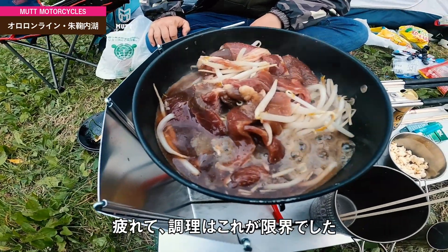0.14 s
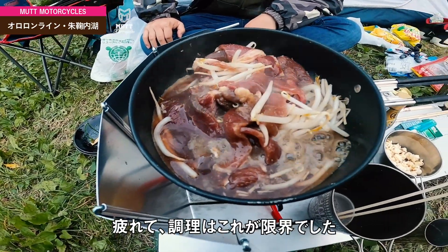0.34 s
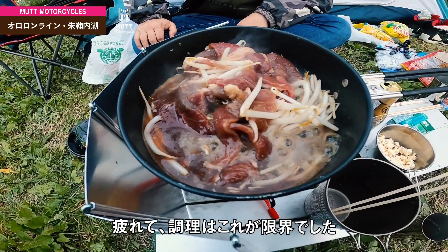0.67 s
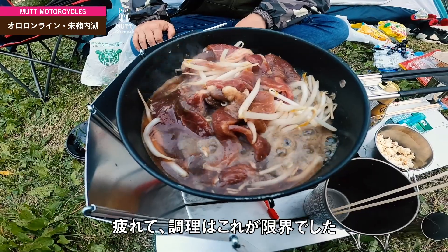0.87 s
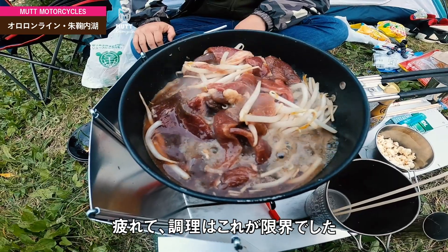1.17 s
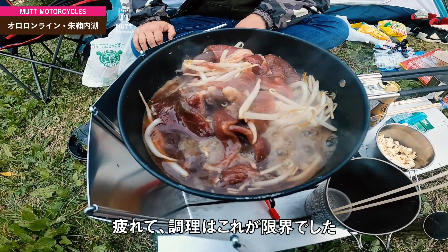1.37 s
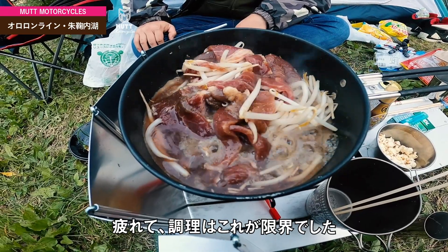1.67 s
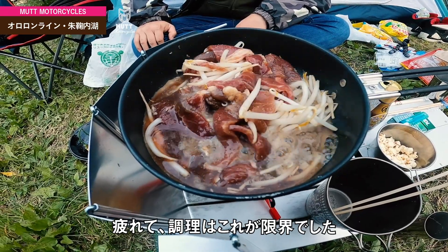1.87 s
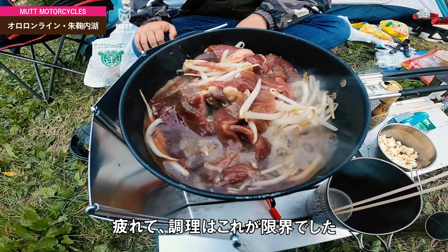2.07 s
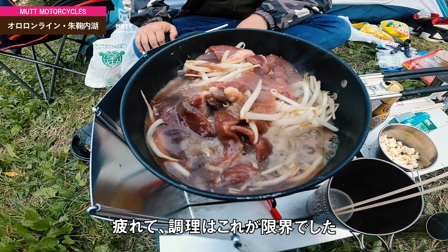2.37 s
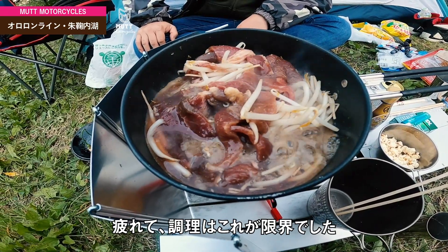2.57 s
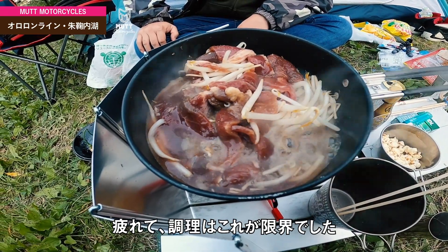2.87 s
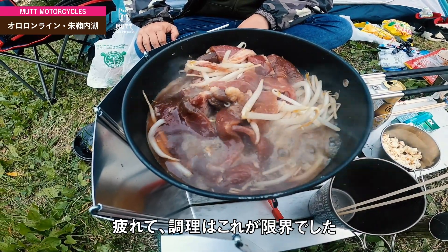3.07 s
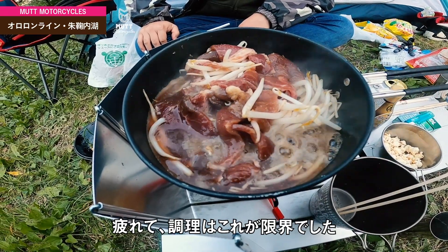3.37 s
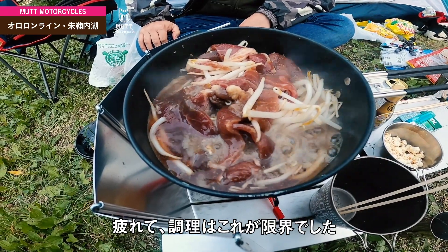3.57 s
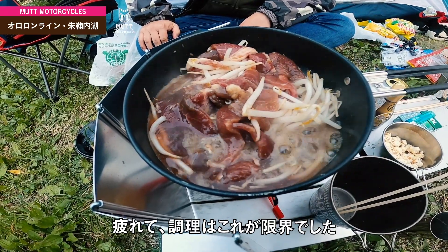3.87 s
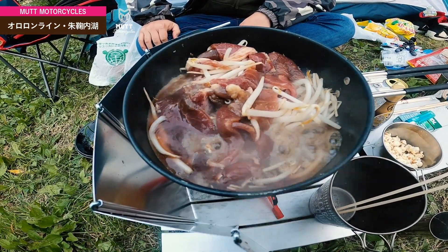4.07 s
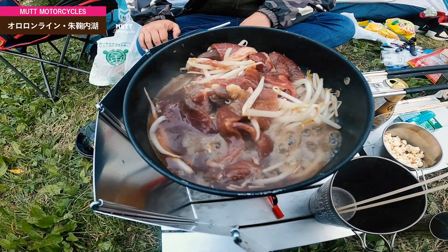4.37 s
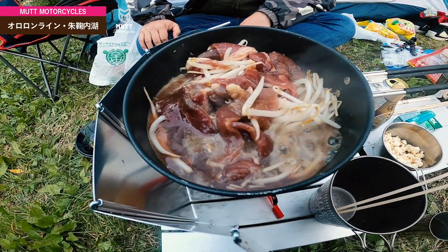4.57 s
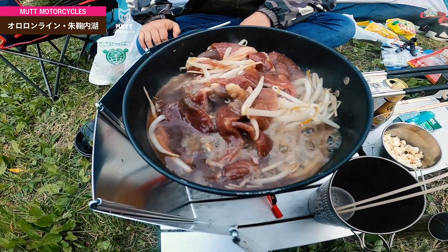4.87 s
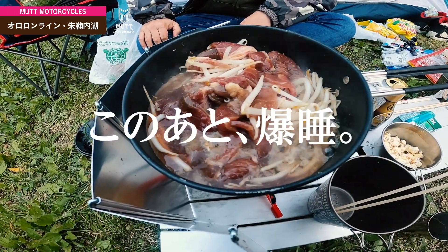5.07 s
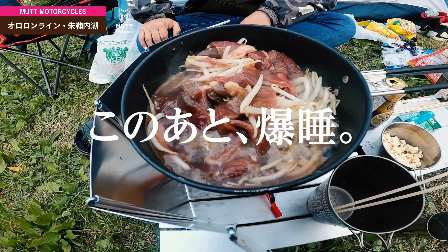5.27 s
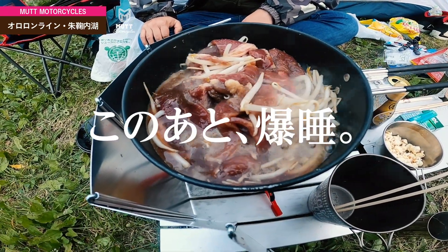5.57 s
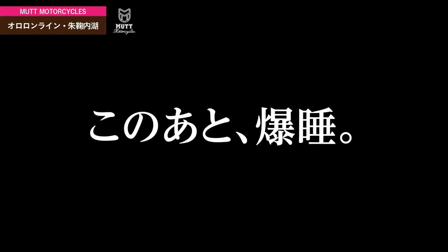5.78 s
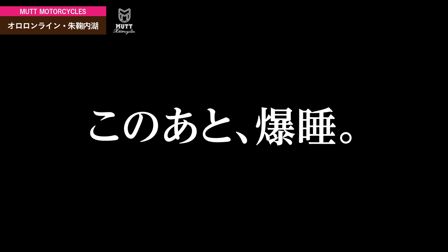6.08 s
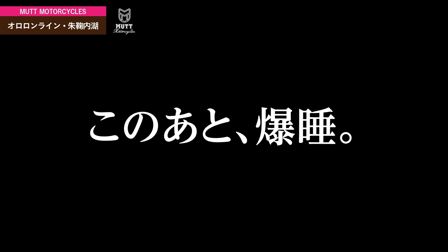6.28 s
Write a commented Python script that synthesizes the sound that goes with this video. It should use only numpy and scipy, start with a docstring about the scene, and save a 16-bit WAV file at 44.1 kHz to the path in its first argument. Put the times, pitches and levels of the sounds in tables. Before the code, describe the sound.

Outdoors, a gas burner roars steadily under a wide pan of bubbling, hissing meat in sauce, fat spitting, then everything cuts to silence.

```python
"""Simmering pan on a camping stove

Outdoors and close by, meat and bean sprouts simmer in sauce in a wide pan: filtered noise makes the burner's
roar, its drone and the hissing steam; dense random impulses through resonances make the bubbles and the fizz.
Fat spits as filtered clicks with a spray of noise. For about a second a trapped pocket of steam sputters in a
fast rattle of damped rings, which later returns faintly. The sound is cut off abruptly."""
import sys
import numpy as np
from scipy import signal
from scipy.fft import rfft, irfft, next_fast_len
from scipy.io import wavfile
from scipy.ndimage import uniform_filter1d

SR = 44100
rng = np.random.default_rng(int(sys.argv[2]) if len(sys.argv) > 2 else 0)


def wav_record(signal):
    """Record a signal, one row per channel, as 16-bit PCM in the file named by sys.argv[1]."""
    frames = np.transpose(np.atleast_2d(signal))
    bounded = np.clip(frames, -1, 1)
    # unit amplitude maps onto the largest positive 16-bit level
    quanta = np.round(bounded * 32767).astype(np.int16)
    wavfile.write(sys.argv[1], SR, quanta)


N = 284134
TIME = np.arange(N) / SR   # seconds
STOP_S = 5.779


def from_db(db):
    """Decibels to gain."""
    return 10 ** (np.asarray(db) / 20)


def rms_one(x):
    """Scale to unit power."""
    return x / np.sqrt(np.mean(x ** 2) + 1e-20)


def in_time(rows):
    """Each column of a curve table, interpolated at every sample."""
    s, *columns = np.transpose(rows)
    return [np.interp(TIME, s, column) for column in columns]


def drift(rate):
    """Slow random wandering with spread 1, made by a low-pass at this rate in Hz."""
    step = 40   # samples between computed points
    r = np.exp(-2 * np.pi * rate * step / SR)
    settle = 2000
    noise = rng.standard_normal(N // step + 2 + settle)
    slow = signal.lfilter([1], [1, -2 * r, r * r], noise)[settle:]
    return np.interp(np.arange(N) / step, np.arange(len(slow)), rms_one(slow))


def swells(rows):
    """Bell-shaped swells as a gain; the length is two standard deviations of the bell."""
    return sum(from_db(db) * np.exp(-2 * ((TIME - peak_s) / length_s) ** 2) for peak_s, length_s, db in rows)


def coloured(x, spectrum):
    """Causal (minimum-phase) filter with the given spectrum, then a gentle band-pass around it."""
    size = 2 * next_fast_len(len(x))
    hz, db = np.transpose(spectrum)
    grid = np.maximum(np.arange(size // 2 + 1) * SR / size, 1)
    cepstrum = irfft(np.log(from_db(np.interp(np.log(grid), np.log(hz), db))))
    # folding the cepstrum forward in time gives minimum phase
    cepstrum[1:size // 2] *= 2
    cepstrum[size // 2 + 1:] = 0
    response = np.exp(rfft(cepstrum))
    shaped = irfft(rfft(x, size) * response)[:len(x)]
    edges = [hz[0] / 2, min(hz[-1] * 2, SR / 2 - 1000)]
    return signal.sosfilt(signal.butter(2, edges, "band", fs=SR, output="sos"), shaped)


def resonance(x, hz, width_hz):
    """Two-pole resonance with gain 1 on top."""
    r = np.exp(-np.pi * width_hz / SR)
    feedback = [1, -2 * r * np.cos(2 * np.pi * hz / SR), r * r]
    return signal.lfilter(np.array([1, 0, -1]) * (1 - r * r) / 2, feedback, x + 1e-18)


def turbulence(spectrum):
    """Rushing gas: noise of the given colour, with rms 1."""
    return rms_one(coloured(rng.standard_normal(N), spectrum))


def steady_turbulence(spectrum):
    """Rushing gas fed at constant pressure: dividing by its own smoothed power evens its loudness; rms 1."""
    steady_s, steadiness = .08, .6   # smoothing time, share of the swings evened out
    rush = turbulence(spectrum)
    power = uniform_filter1d(rush ** 2, int(steady_s * SR))
    return rms_one(rush / (power + 1e-9) ** (steadiness / 2))


def bubbles(spectrum, per_s, spread_db, clump_db, wash_db):
    """Uneven bubbles burst in clumps, each a short damped ring, over a wash of countless faint ones; rms 1."""
    born = rng.random(N) < per_s * from_db(clump_db * drift(25)) / SR
    sizes = from_db(spread_db * np.minimum(rng.exponential(1, N), 4.5)) * rng.choice([-1, 1], N)
    pitches = np.geomspace(spectrum[1][0], spectrum[-2][0], num=8)
    dealt = rng.integers(0, len(pitches), N)
    rings = sum(resonance(born * sizes * (dealt == k), hz, hz * 0.5) for k, hz in enumerate(pitches))
    wash = from_db(wash_db) * turbulence(spectrum)
    return rms_one(rms_one(coloured(rings, spectrum)) + wash)


def click():
    """A single impulse with room to ring."""
    return signal.unit_impulse(2048)


def pop(hz, width_hz):
    """One burst: an impulse through two equal resonances gives a heavily damped ring, peak 1."""
    wave = resonance(resonance(click(), hz, width_hz), hz, width_hz)
    wave = signal.sosfilt(signal.butter(8, min(hz * 1.51, SR / 3), fs=SR, output="sos"), wave)
    return wave / np.abs(wave).max()


def add(out, s, wave):
    """Mix a short sound in at time s."""
    start = int(s * SR)
    out[start:start + len(wave)] += wave[:N - start]


def by_chance(per_s, vigour_db):
    """Random moments, closer together when vigour is high: rows (start_s, two random values of spread near 1)."""
    gaps = rng.exponential(1, 200)
    chance = np.clip(rng.standard_normal((200, 2)), -2, 2)
    due = np.cumsum(per_s * from_db(vigour_db) ** 2) / SR   # events expected so far
    times = np.searchsorted(due, np.cumsum(gaps)) / SR
    return np.column_stack([times, chance])[times < STOP_S]


def whistle(hz, width_hz):
    """Steam singing in a small gap: a narrow band of noise around a pitch that may move; rms 1."""
    r = np.exp(-np.pi * width_hz / SR)
    sine, cosine = signal.lfilter([1], [1, -2 * r, r * r], rng.standard_normal((2, N)))
    phase = 2 * np.pi * np.cumsum(hz * np.ones(N)) / SR
    return rms_one(sine * np.sin(phase) + cosine * np.cos(phase))


# Colour of the flame's roar, shape only: frequency_hz, level_db (per Hz)
ROAR_COLOUR = [(200, -30), (310, -11), (375, -2.5), (425, 1), (490, -0.5), (570, -4), (645, -10),
               (690, -12), (900, -24), (2000, -16), (6000, -59)]
# Strength of the flame: time_s, level_db (about its mean)
FLAME_STRENGTH = [(0, -0.5), (0.35, 1), (0.55, -3.0), (1.05, 1.5), (1.35, -1), (1.55, -1.5), (2.75, 1.0),
                  (3.05, -1.5), (3.55, 1), (3.8, -2.5), (4.4, -1.5), (4.7, -1), (5.77, 0)]


def roar():
    """The flame under the pan: steady rushing gas whose level follows its strength and flickers a little."""
    strength_db, = in_time(FLAME_STRENGTH)
    return from_db(-29 + strength_db + 0.64 * drift(8.8)) * steady_turbulence(ROAR_COLOUR)


# Colour of the low rumble of the burner, shape only: frequency_hz, level_db (per Hz)
RUMBLE_COLOUR = [(30, -31.5), (55, -18.5), (85, -8.5), (125, 0), (160, 0.5), (230, -4), (300, -2),
                 (450, -9.5), (800, -47), (3000, -74)]


def rumble():
    """The burner's low rumble: steady deep noise at one level."""
    return from_db(-34) * steady_turbulence(RUMBLE_COLOUR)


# Colour of the drone in the gap under the pan, shape only: frequency_hz, level_db (per Hz)
DRONE_COLOUR = [(105, -24), (148, -4), (188, 2), (218, -1), (255, -6.5), (330, -19)]
# Colour of air buffeting the flame, shape only: frequency_hz, level_db (per Hz)
BUFFET_COLOUR = [(15, -19.5), (28, -5.5), (46, -5), (70, 4), (110, -16.5), (250, -35.5)]
# Gusts reaching the stove: peak_s, length_s, buffeting level_db, level_db of the drone they stir up
GUSTS = [(.38, 0.066, -38, -36.5), (2.32, .05, -56, -38), (2.672, .1, -48, -47), (3.575, .06, -40, -37.5),
         (4.01, .055, -40.5, -59), (4.85, .065, -39.5, -45)]


def drone():
    """The gap under the pan drones: a low noise band that gusts stir up and that quickly drops in level once."""
    falls_s, fall_length_s, fall_db = 4.56, .035, 8
    stirred = swells([(s, length_s, drone_db) for s, length_s, _, drone_db in GUSTS])
    fallen = np.clip((TIME - falls_s) / fall_length_s, 0, 1)
    return (from_db(-32.5) + stirred) * from_db(-fall_db * fallen) * steady_turbulence(DRONE_COLOUR)


def buffeting():
    """Breeze catches the flame: low noise, light and wandering between gusts, swelling with each gust."""
    gusts = swells([(s, length_s, buffet_db) for s, length_s, buffet_db, _ in GUSTS])
    light_air = from_db(-58.5 + 3.5 * drift(4))
    return (light_air + gusts) * steady_turbulence(BUFFET_COLOUR)


# Colours of bubbles mid-pan, sizzle at the metal and surface fizz, shape only: frequency_hz, level_db (per Hz)
BUBBLING_COLOUR = [(350, -13.5), (600, -1), (750, 0.5), (1000, 0.5), (1300, 0.5), (1620, 3), (1850, -0.5),
                   (2080, 0), (2450, -4), (2750, -17), (3100, -7), (4200, -30), (8000, -45.5)]
SIZZLE_COLOUR = [(1500, -14), (2500, -4), (2800, -0.5), (3050, -6), (3450, 1), (3800, -3), (4250, -7),
                 (5000, -12.5), (5800, -23.5), (7500, -19), (12000, -52)]
FIZZ_COLOUR = [(3500, -25), (5700, 5), (6400, -0.5), (7100, 1), (7850, -7), (8300, -0.5), (8720, -2),
               (9130, 3), (9800, -1.5), (10200, 0), (10700, -6), (12000, -13.5), (13500, -27), (15700, -48)]
# Vigour of the boil: time_s, level_db (about its mean)
BOIL = [(0, -1.5), (0.3, 1), (0.55, -1.5), (1.15, -2), (1.6, 0), (1.77, -0.5), (2.35, 1.6), (3.05, 0.5),
        (3.5, 1), (3.7, 0.5), (4.33, -2), (4.85, 1.5), (5.13, -3.5), (5.27, 1.5), (5.77, 0)]
# Fizzing of the surface: time_s, level_db (about its mean)
FIZZING = [(0, -3), (0.27, 2.5), (0.48, -2.5), (0.9, -1.5), (1.8, 1), (3.1, 0.0), (3.45, 2.5), (3.68, -2),
           (3.9, 1.5), (4.3, -1), (4.7, 1.5), (5.05, -1.5), (5.35, 0.5), (5.77, 2)]
FIZZ_DB = -47.5   # at mean fizzing


def simmer():
    """Sauce bubbles mid-pan, sizzles at the metal and fizzes on top: the smaller the bubbles, the higher."""
    boil_db, = in_time(BOIL)
    fizzing_db, = in_time(FIZZING)
    bubbling = bubbles(BUBBLING_COLOUR, per_s=1700, spread_db=3.0, clump_db=2.5, wash_db=-4.0)
    sizzle = bubbles(SIZZLE_COLOUR, per_s=3300, spread_db=4.5, clump_db=3.0, wash_db=2.0)
    fizz = bubbles(FIZZ_COLOUR, per_s=5600, spread_db=3.5, clump_db=3.5, wash_db=-3.5)
    layers = [(-32 + boil_db, bubbling),
              (-36.5 + 0.84 * boil_db, sizzle),   # follows most of the boil's swing
              (FIZZ_DB + fizzing_db, fizz)]
    # each layer surges a little on its own
    return sum(from_db(db + 0.41 * drift(5.3)) * layer for db, layer in layers)


# Colour of the narrow steam leak, shape only: frequency_hz, level_db (per Hz)
NARROW_JET_COLOUR = [(4500, -44), (5050, -7.5), (5210, -2.5), (5400, 2.5), (5560, -13), (5680, -22),
                     (6300, -35.5)]
# Strength of the leak: time_s, level_db
LEAK = [(0, -53), (.7, -56), (1.5, -56), (2.3, -53.5), (3.4, -51.5), (3.8, -53), (4.4, -48), (5.1, -54),
        (5.77, -50.5)]


def leak():
    """Steam leaks through the food in a narrow, unsteady jet: a tight band of noise."""
    leak_db, = in_time(LEAK)
    return from_db(leak_db + drift(9.7)) * turbulence(NARROW_JET_COLOUR)


# Colour of the broad gush of steam, shape only: frequency_hz, level_db (per Hz)
WIDE_JET_COLOUR = [(3000, -37), (3700, 7), (4300, 2), (5100, -6), (5500, 8.5), (5800, 7), (6550, 5),
                   (7400, -13), (10000, -24.5), (12000, -22), (15500, -24.5)]


def gush():
    """One broad gush of steam: already hissing, it opens wide, holds, then dies away."""
    opens_s, attack_s, hold_s = 0.17, 0.036, 0.089
    before_db, open_db, fall_db_per_s = -47, -38.5, 49
    open_s = opens_s + attack_s
    gush_db = np.interp(TIME, [opens_s, open_s], [before_db, open_db])
    dying_db = fall_db_per_s * np.maximum(TIME - open_s - hold_s, 0)
    return from_db(gush_db - dying_db + .8 * drift(20)) * turbulence(WIDE_JET_COLOUR)


# The thin whistle of steam: time_s, level_db, pitch_hz
WHISTLE = [(0, -63, 8200), (.7, -60.5, 8350), (1.1, -54, 8400), (1.45, -54, 8400), (1.62, -58.5, 8350),
           (1.85, -54, 8320), (2.15, -55, 8450), (2.65, -54.5, 8420), (3.0, -58, 8400), (3.6, -56.5, 8350),
           (3.9, -61.5, 8400), (4.8, -64, 8350), (5.1, -62, 8400), (5.4, -53, 8480), (5.77, -51, 8380)]


def thin_whistle():
    """Steam whistles thinly: a narrow band of noise whose pitch and level waver."""
    whistle_db, whistle_hz = in_time(WHISTLE)
    wavering_hz = whistle_hz + 45 * drift(6)
    return from_db(whistle_db + 1.3 * drift(12)) * whistle(wavering_hz, width_hz=420)


# Colour of ticking specks of fat, shape only: frequency_hz, level_db (per Hz)
SPECK_COLOUR = [(2500, -11.5), (4000, -5), (7000, 1), (10000, -2.5), (12000, -11), (13500, -11.5),
                (15500, -24)]


def crackle():
    """Specks of fat tick faintly at random, as coloured impulses, more often and louder while the pan fizzes."""
    level = from_db(FIZZ_DB + in_time(FIZZING)[0])
    born = rng.random(N) < 28 * rms_one(level) / SR   # 28 per second at the rms level
    sizes = from_db(2.5 * rng.standard_normal(N)) * rng.choice([-1, 1], N)
    return from_db(-15.5) * level * rms_one(coloured(born * sizes, SPECK_COLOUR))


# Colour of the faint stereo noise, shape only: frequency_hz, level_db (per Hz)
STEREO_NOISE_COLOUR = [(300, -8.5), (1500, -14.5), (2800, -12.5), (4500, -8), (7800, -9.5), (9200, -9),
                       (10800, 3.5), (12200, 7), (13500, 5), (15700, -15)]


def stereo_noise():
    """Very faint high noise, to be set opposite in left and right, whose level follows the fizzing curve."""
    return from_db(-69.5 + in_time(FIZZING)[0]) * turbulence(STEREO_NOISE_COLOUR)


# Spurts of the narrow steam jet: peak_s, length_s, level_db, pitch_hz, width_hz
SPURTS = [(.05, .2, -44.5, 5570, 601), (4.5, .12, -54, 5500, 400), (4.68, .085, -41, 5300, 450),
          (4.83, 0.094, -48, 5400, 600), (5.34, .16, -45.5, 5250, 380), (5.62, .15, -50, 5300, 450)]


def spurts():
    """Steam spurts briefly, each spurt a swelling band of noise at its own pitch."""
    return sum(swells([(s, length_s, db)]) * whistle(hz, width_hz) for s, length_s, db, hz, width_hz in SPURTS)


# Sauce heaving up: peak_s, length_s, level_db
HEAVES = [(.07, .04, -31), (1.51, 0.036, -38.5), (1.66, 0.03, -33), (1.845, 0.028, -29.5),
          (3.19, 0.021, -30.5), (3.3, .035, -36), (5.55, .04, -31.5)]


def heaves():
    """Steam gathered under the food escapes and the sauce heaves up in short rushes of bubbles."""
    return swells(HEAVES) * bubbles(BUBBLING_COLOUR, per_s=900, spread_db=5.5, clump_db=3.0, wash_db=-8.5)


# Largest droplets of fat: start_s, level_db (nominal peak at full body), body_db (weight of the low body)
SPITS = [(.0742, -15.5, -1), (1.515, -20, -3), (1.649, -20, -6), (1.839, -11.5, -8), (2.7092, -15.5, -3),
         (2.9497, -17.5, -6), (3.32, -4.8, 0), (3.3494, -18.5, -3), (3.445, -17, -5), (3.585, -18.5, -6),
         (3.982, -20, -6), (4.616, -13.5, -4), (5.4655, -11.5, -4)]
# Colour of a spit at full body, shape only: frequency_hz, level_db (per Hz)
SPIT_COLOUR = [(200, -19), (800, 9), (1500, 0.5), (2400, 4.5), (3800, 3.5), (4500, 2), (5300, -11),
               (6400, 3), (7300, -2), (8300, -8), (9500, -3.5), (10600, -34), (15000, -41.5)]


def spits():
    """Droplets of fat go off with a sharp tick and a brief spray; random small ones are thinner."""
    out = np.zeros(N)
    lesser = [(s, -24 + 1.2 * size, -5) for s, size, _ in by_chance(2.5, in_time(FIZZING)[0])]
    tick = coloured(click(), SPIT_COLOUR)
    noises = rng.standard_normal((80, len(tick)))
    for (s, db, body_db), noise in zip(list(SPITS) + lesser, noises):
        colour = [(hz, level_db + body_db * (hz < 5000)) for hz, level_db in SPIT_COLOUR]
        spray = from_db(-27) * noise * np.exp(-TIME[:len(tick)] / 0.0018)
        add(out, s, from_db(db) * coloured(click() + spray, colour) / np.abs(tick).max())
    return out


# Largest bubbles bursting: start_s, level_db (peak), pitch_hz
POPS = [(.0794, -16.5, 2000), (.1916, -18, 1600), (.421, -16.5, 2200), (.6352, -16, 2100),
        (.8765, -17, 1900), (.978, -17, 1900), (1.002, -16, 1800), (1.1202, -18.5, 1800),
        (1.1887, -18.5, 1900), (1.301, -18.5, 1700), (1.4258, -17, 2000), (1.4492, -18.5, 1700),
        (1.4745, -18, 2400), (1.5003, -17.5, 1600), (1.5137, -16, 1600), (1.552, -17.5, 2000),
        (1.5793, -16, 2000), (1.627, -17.5, 1500), (1.671, -15, 1900), (1.6955, -18.5, 2400),
        (1.717, -17.5, 2100), (1.739, -18.5, 2300), (1.8917, -17.5, 1450), (1.95, -17.5, 1500),
        (1.977, -17.5, 1500), (1.985, -16, 1800), (2.7514, -11.5, 2100), (3.3495, -15.5, 3400),
        (3.3666, -16, 3200), (3.4378, -18, 1800), (3.445, -14, 1700), (3.4827, -15.5, 1900),
        (3.497, -18, 1700), (3.599, -18, 2300), (3.642, -17.5, 2200), (3.7286, -16, 2100),
        (3.8473, -17, 2000), (4.3854, -19, 1500), (4.5573, -17, 1900), (4.804, -10.5, 2000),
        (4.8374, -17.5, 1900), (4.881, -15.5, 1700), (5.0232, -17, 1500), (5.3346, -17.5, 2200),
        (5.525, -14, 1550), (5.609, -15, 2100), (5.651, -18.5, 1900)]


def venting(s):
    """Whether the pocket of steam is sputtering at time s, with a small margin."""
    return any(first_s - .02 < s < last_s + .02 for first_s, last_s, *_ in SPUTTER)


def pops():
    """Single large bubbles pop as damped rings; lesser ones follow the boil by chance, but not amid sputtering."""
    out = np.zeros(N)
    lesser = [(s, -23 + size, 1950 * np.exp(.15 * pitch))
              for s, size, pitch in by_chance(14, in_time(BOIL)[0]) if not venting(s)]
    for s, db, hz in list(POPS) + lesser:
        add(out, s, from_db(db) * pop(hz, hz * 0.77))
    return out


# Sauce running onto hot metal: peak_s, length_s, level_db, pitch_hz, width_hz (of each of two resonances)
SIZZLES = [(0.22, .055, -36, 3820, 900), (.33, .11, -40, 3830, 1000), (2.044, 0.034, -32, 3620, 1100),
           (2.217, 0.035, -31.5, 3650, 1303), (2.544, .027, -32.5, 3800, 1100),
           (2.755, 0.017, -37.5, 4350, 900), (3.0, .06, -37, 3350, 800), (3.349, 0.03, -29.5, 3640, 650),
           (3.633, 0.029, -35.5, 3620, 1200), (5.05, 0.061, -35.5, 3650, 1900),
           (5.461, 0.053, -34.5, 3640, 1700)]
# Colour of the froth that boils off, shape only: frequency_hz, level_db (per Hz)
FROTH_COLOUR = [(2000, -3.5), (2900, 0), (4200, -5), (5000, -5), (6000, -8.5), (13000, -25)]


def sizzles():
    """A little sauce meets bare metal and boils off in a short puff; bubbles of like size give it a pitch."""
    out = np.zeros(N)
    froth = bubbles(FROTH_COLOUR, per_s=1200, spread_db=3.0, clump_db=1.5, wash_db=8.5)
    for s, length_s, db, hz, width_hz in SIZZLES:
        pitched = rms_one(resonance(resonance(froth, hz, width_hz), hz, width_hz))
        out += swells([(s, length_s, db)]) * pitched
    return out


# Large pockets of steam gurgling: peak_s, length_s, level_db
GURGLES = [(.91, 0.048, -28.5), (1.054, .012, -37), (1.096, 0.013, -23), (1.225, 0.02, -26),
           (1.53, 0.014, -22.5), (1.557, .012, -22.5), (1.8, 0.026, -25.5), (1.854, .012, -31),
           (1.902, 0.014, -24), (2.133, .012, -26), (2.227, 0.014, -23.5), (2.432, .014, -23),
           (2.537, .015, -23.5), (3.206, 0.019, -28.5), (3.408, 0.038, -27.5), (3.543, 0.016, -26),
           (3.58, 0.024, -27), (4.68, 0.0071, -23)]


def gurgles():
    """Large pockets of steam escape in low gurgles: swelling tones whose pitch wobbles fast."""
    pocket_hz = 440 * np.exp(.11 * drift(70))
    tone = np.sin(2 * np.pi * np.cumsum(pocket_hz) / SR)
    return swells(GURGLES) * rms_one(tone)


# Runs of sputtering: start_s, end_s, number of puffs, first, middle and last level_db (peak), pitch_hz
SPUTTER = [(2.159, 2.228, 5, -16.5, -18.5, -16, 2150), (2.244, 2.2755, 3, -12.5, -15, -14.5, 2150),
           (2.2952, 2.3135, 2, -11.5, -13, -14, 2150), (2.3275, 2.3975, 5, -13.5, -12.5, -15, 2150),
           (2.4248, 2.4755, 4, -13.5, -16.5, -14.5, 2150), (2.5025, 2.6076, 7, -12.5, -13, -12.5, 2350),
           (2.6224, 2.6916, 5, -12, -13, -12, 2300), (2.7982, 2.8508, 4, -12, -13, -12, 2300),
           (2.8665, 2.902, 3, -10, -10.8, -9, 2300), (2.9202, 2.966, 4, -12, -12, -15, 2400),
           (2.9945, 3.0248, 3, -10, -10.5, -11.5, 2450), (3.0444, 3.0628, 2, -13, -13, -13, 2400),
           (3.182, 3.2165, 3, -19, -17.5, -19, 1650), (3.2485, 3.265, 2, -16.5, -16.5, -16.5, 1450),
           (3.675, 3.7635, 6, -17.5, -17.5, -19, 1900), (3.8272, 3.9272, 6, -18, -18.5, -18.5, 2050)]


def sputter():
    """A pocket of steam under the meat fills and vents, nearly regularly, in runs of damped puffs."""
    late_s, spread_db, pitch_spread = .0003, .4, .06   # how much the puffs differ
    out = np.zeros(N)
    for first_s, last_s, count, first_db, middle_db, last_db, hz in SPUTTER:
        chance = rng.standard_normal((count, 3))
        for s, (late, size, pitch) in zip(np.linspace(first_s, last_s, count), chance):
            db = np.interp(s, [first_s, (first_s + last_s) / 2, last_s], [first_db, middle_db, last_db])
            puff = pop(hz * np.exp(pitch_spread * pitch), width_hz=2100)
            add(out, s + late_s * late, from_db(db + spread_db * size) * puff)
    return out


def scene():
    """Stove and pan are straight ahead, in open air with no echo; a very faint stereo noise adds slight width."""
    burner = roar() + rumble() + drone() + buffeting()
    steam = leak() + gush() + thin_whistle() + spurts()
    food = simmer() + crackle() + heaves() + spits() + pops() + sizzles() + gurgles() + sputter()
    # the noise has opposite sign in left and right; all else is central
    return burner + steam + food + stereo_noise() * np.array([[1], [-1]])


def record(dry):
    """The sound stops dead and a steep low-pass removes the top."""
    low_pass = signal.ellip(10, .1, 80, 15650, fs=SR, output="sos")
    return signal.sosfilt(low_pass, dry * (TIME < STOP_S))


dry = scene()
out = record(dry)
wav_record(out)
```